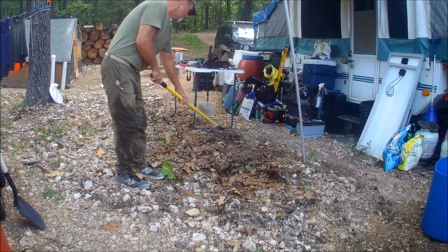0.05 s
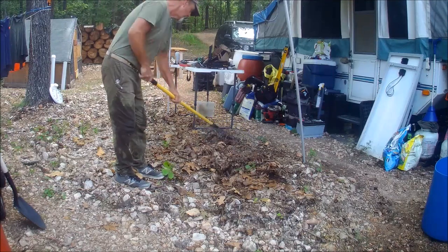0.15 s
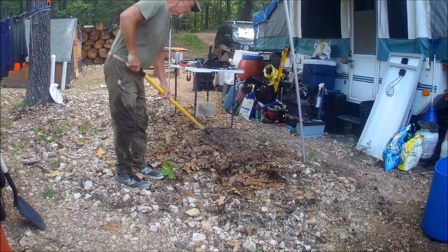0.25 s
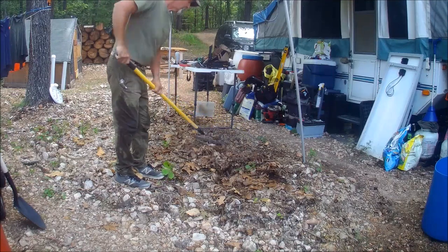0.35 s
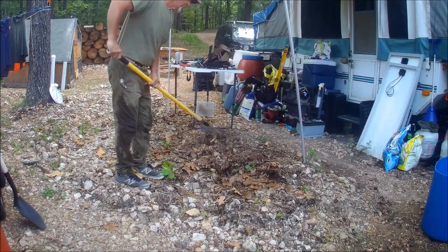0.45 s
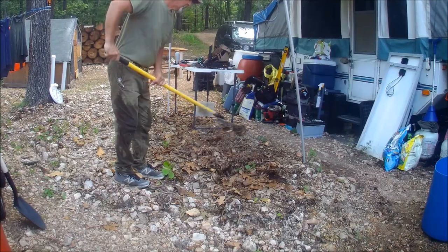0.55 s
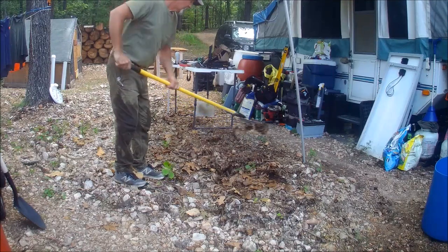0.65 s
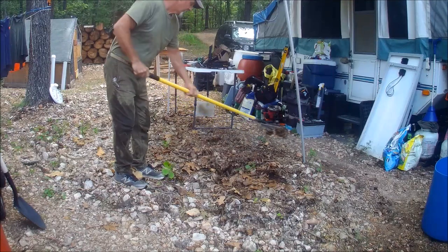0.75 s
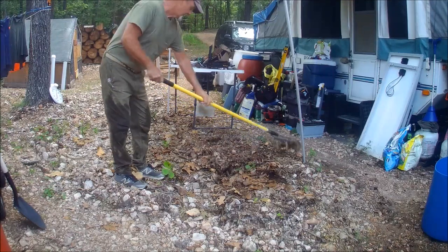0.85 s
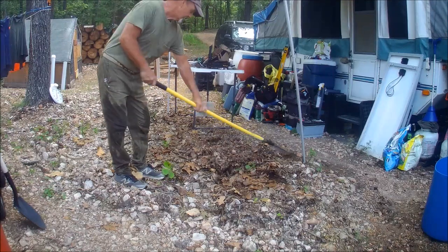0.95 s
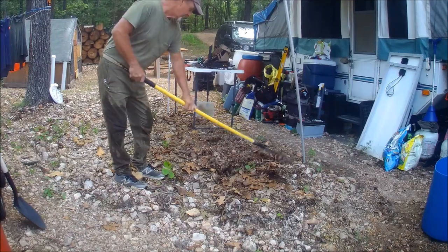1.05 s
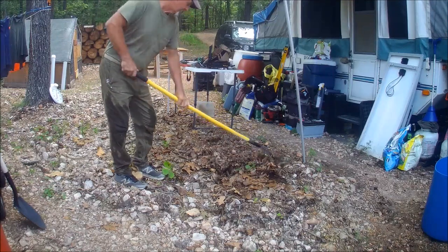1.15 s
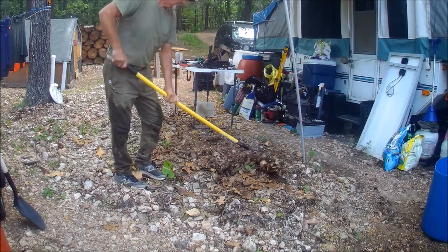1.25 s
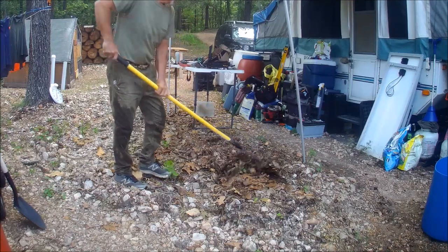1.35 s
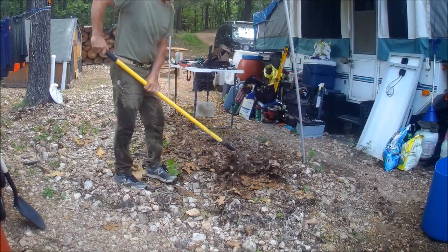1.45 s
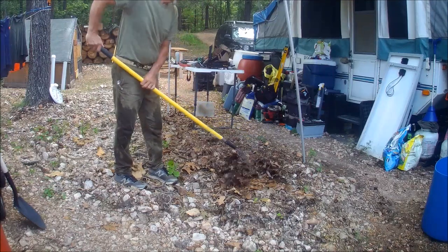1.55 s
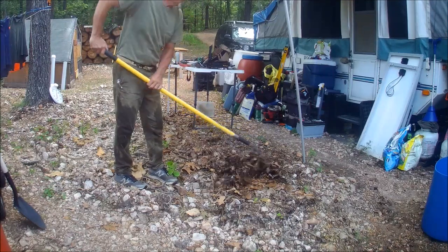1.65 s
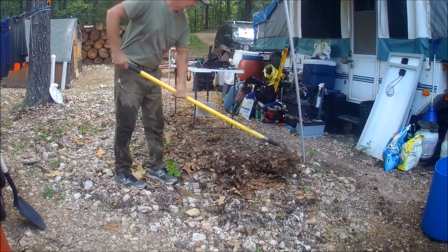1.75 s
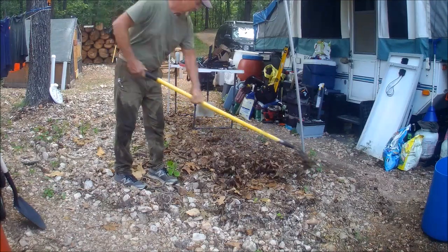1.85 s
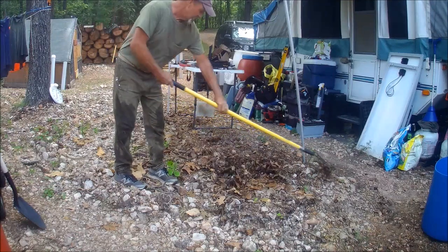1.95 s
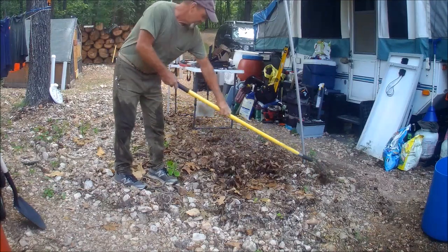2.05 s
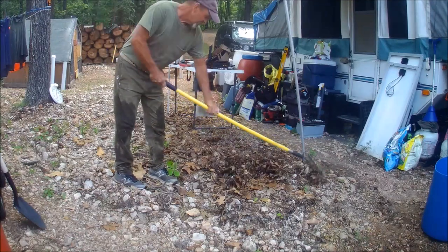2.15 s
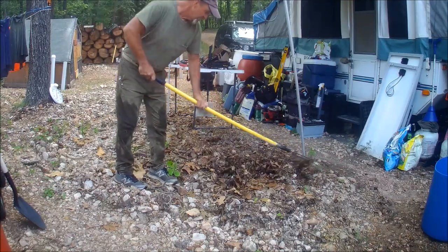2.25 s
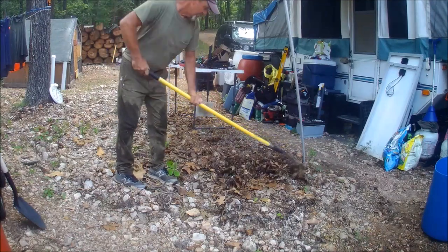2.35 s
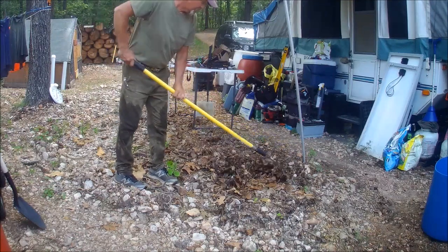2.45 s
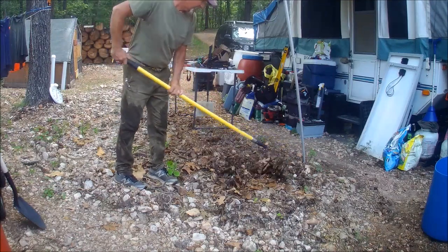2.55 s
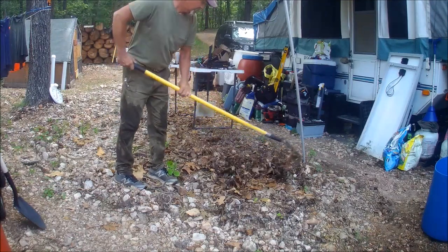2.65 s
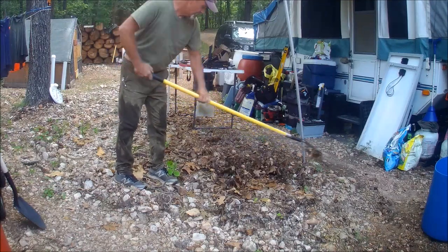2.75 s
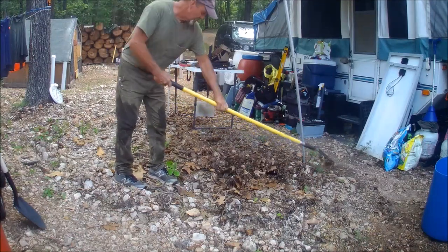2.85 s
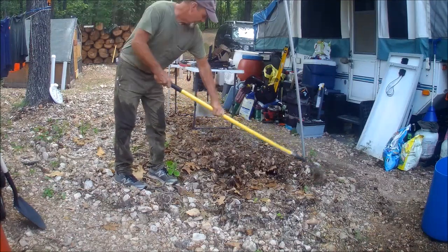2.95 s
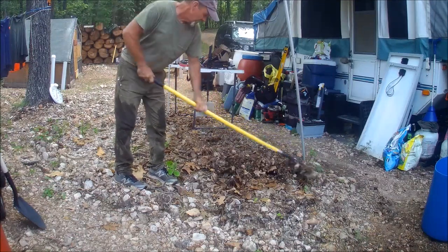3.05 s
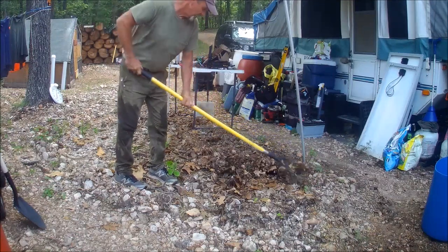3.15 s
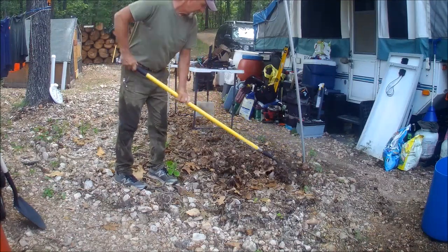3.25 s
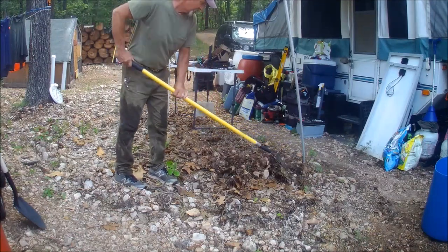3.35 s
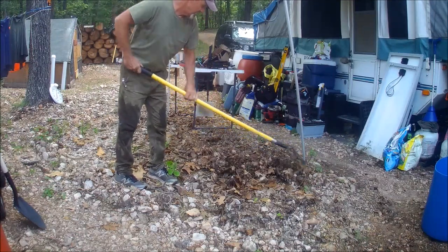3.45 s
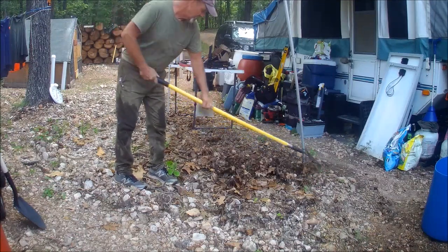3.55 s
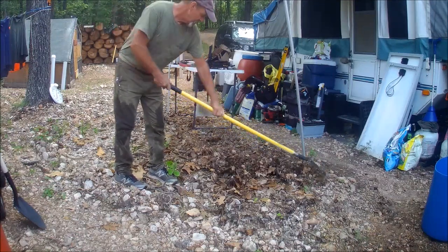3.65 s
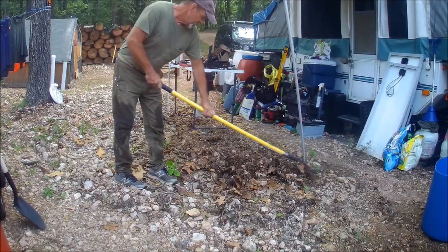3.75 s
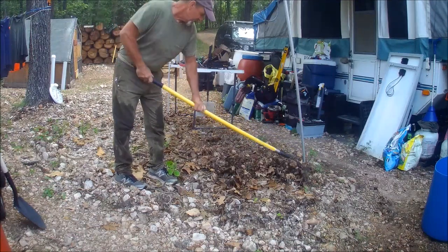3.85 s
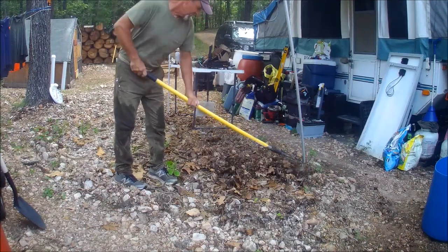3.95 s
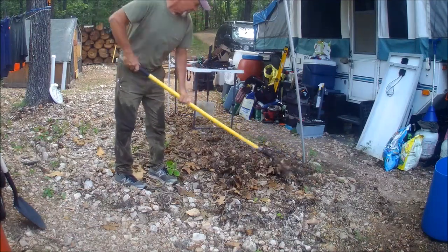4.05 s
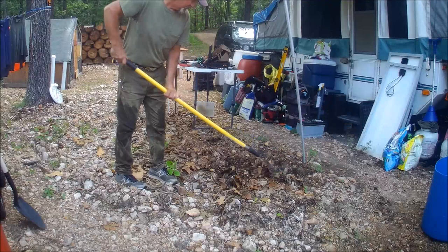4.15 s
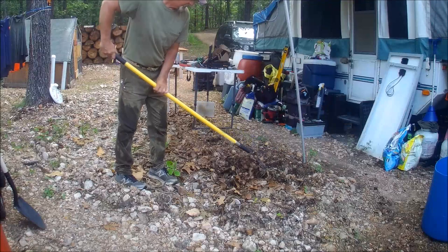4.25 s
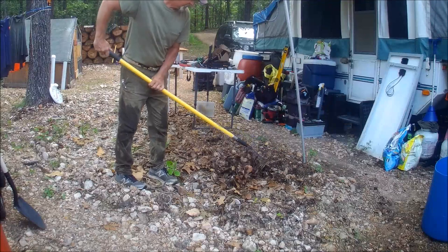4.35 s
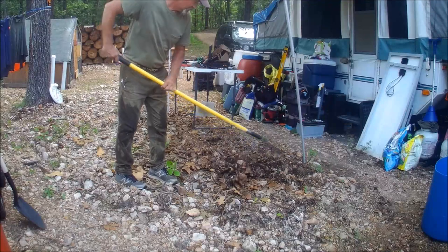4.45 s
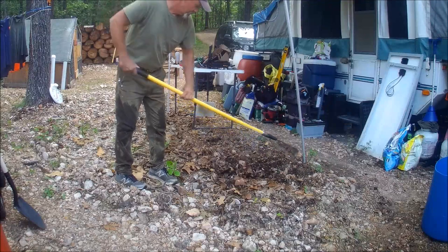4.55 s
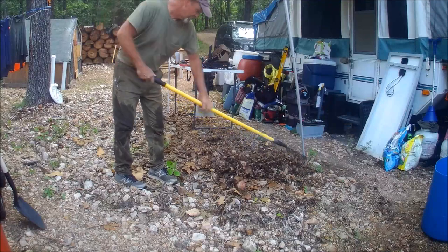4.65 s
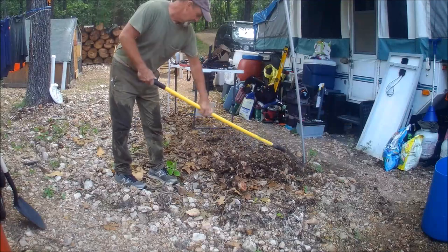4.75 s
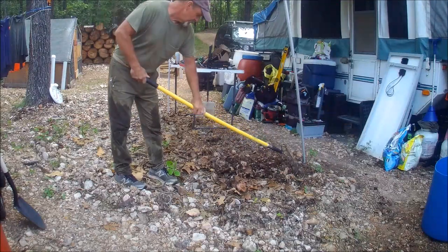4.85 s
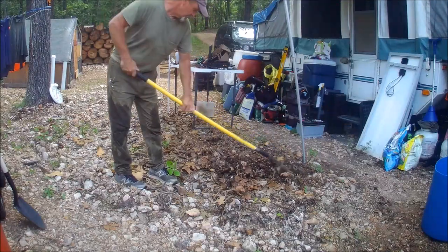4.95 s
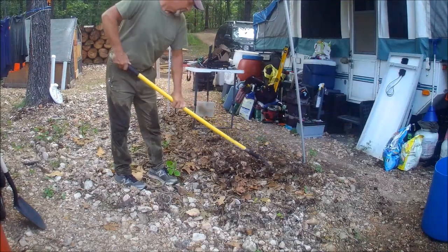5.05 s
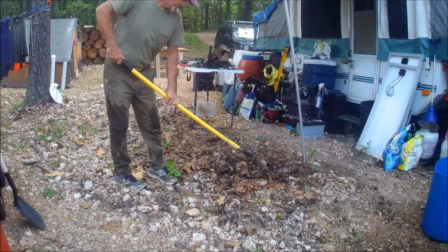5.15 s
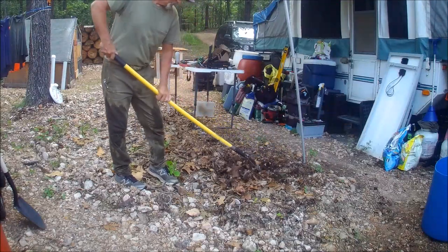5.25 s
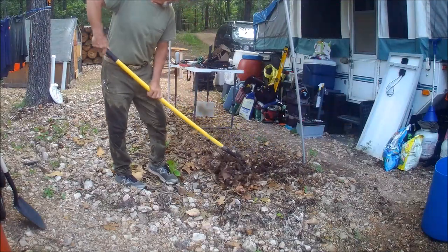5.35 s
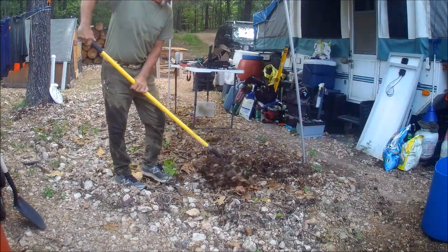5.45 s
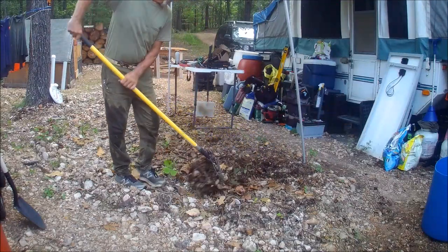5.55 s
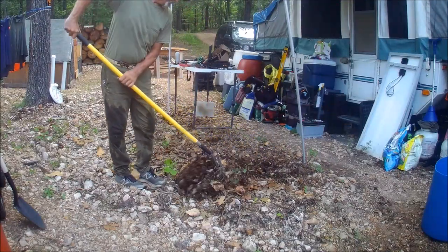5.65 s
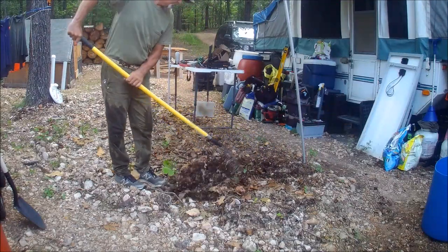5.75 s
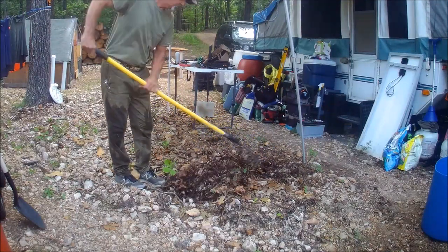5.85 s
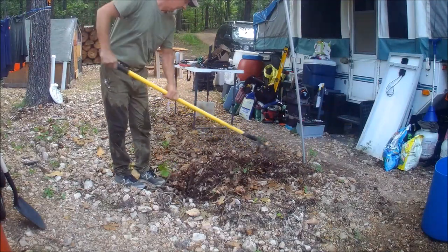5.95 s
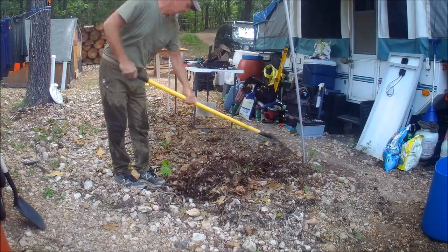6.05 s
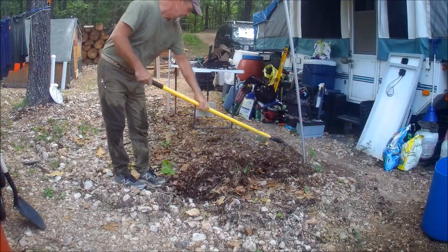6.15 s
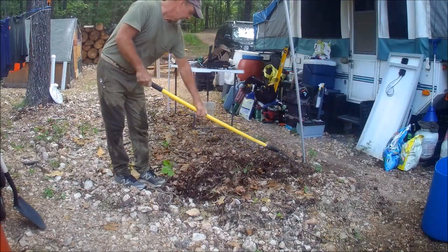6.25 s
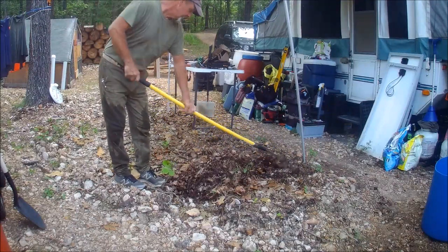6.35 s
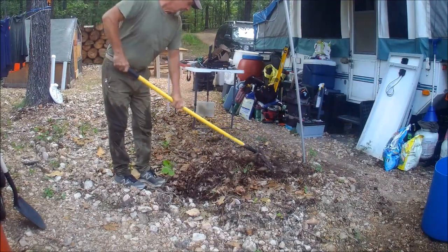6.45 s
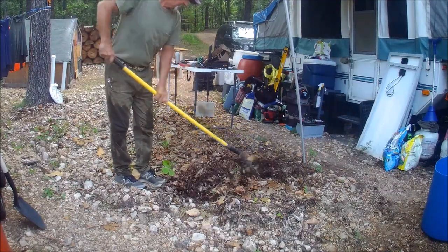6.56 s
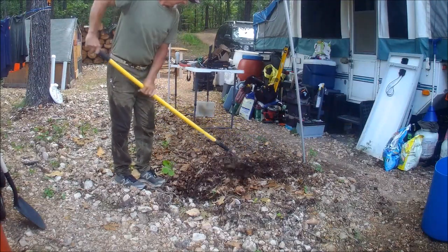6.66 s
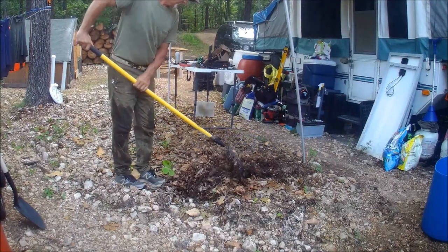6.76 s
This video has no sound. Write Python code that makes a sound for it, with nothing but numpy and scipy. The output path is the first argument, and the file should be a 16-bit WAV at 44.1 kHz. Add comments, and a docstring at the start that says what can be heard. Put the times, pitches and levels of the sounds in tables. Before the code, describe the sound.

Crunchy raking of leaves and stony ground outdoors, scrape after scrape with bright ticks, dull soil knocks and a brief bird whistle.

```python
"""Raking leaves and gravel

In a wooded yard a steel rake is pulled through dry leaves and gravel, a few metres from one microphone.
The strokes are gritty noise shaped by the pull; struck tines and stones are short resonances and sines.
Puffs of noise knock the soil, a gliding sine whistles as a bird, and dying noise makes the trees' tail.
A faint outdoor hush of filtered noise lies below."""
import sys
import numpy as np
from scipy import signal
from scipy.io import wavfile

SR = 44100
rng = np.random.default_rng(int(sys.argv[2]) if len(sys.argv) > 2 else 0)


def file_out(sig):
    """Save sig as 16-bit WAV at sys.argv[1]."""
    # one column per channel
    cols = np.atleast_2d(sig).T
    # limit, then scale
    lim = np.clip(cols, -1, 1)
    pcm = np.round(lim * 32767).astype(np.int16)
    wavfile.write(sys.argv[1], SR, pcm)


def invert_db(level):
    """Linear amplitude ratio for a level in decibels (20 dB per decade), elementwise."""
    return 10 ** (np.asarray(level, dtype=float) / 20)


N = 300315   # samples


def rms_one(x):
    """Scaled to rms 1."""
    return x / np.sqrt(np.mean(x ** 2) + 1e-20)


def at_hz(points, hz):
    """A spectrum read on a log-frequency axis."""
    table_hz, values = np.transpose(points)
    return np.interp(np.log(hz), np.log(table_hz), values)


def drift(rate_hz):
    """Slow random wander of rms 1: noise through two equal poles, one value every 40 samples."""
    r = np.exp(-2 * np.pi * rate_hz * 40 / SR)
    noise = rng.standard_normal(N // 40 + 2002)
    slow = signal.lfilter([1], [1, -2 * r, r * r], noise)[2000:]   # the filter has settled by then
    return np.interp(np.arange(N) / 40, np.arange(len(slow)), rms_one(slow))


def resonance(x, hz, width_hz):
    """A two-pole ring with gain 1 at its peak."""
    r = np.exp(-np.pi * width_hz / SR)
    feedback = [1, -2 * r * np.cos(2 * np.pi * hz / SR), r * r]
    return signal.lfilter((1 - r * r) / 2 * np.array([1, 0, -1]), feedback, x)


def octave_parts(low_hz, count):
    """Centre and band-pass filter of each of count bands an octave."""
    edges = low_hz * 2 ** np.arange(0, np.log2(17000 / low_hz), 1 / count)
    return [(np.sqrt(a * b), signal.butter(2, [a, b], "band", fs=SR, output="sos"))
            for a, b in zip(edges, edges[1:])]


def random_clicks(per_s, clump_db, clump_hz, spread_db):
    """Clumped clicks of random sign and uneven size, rms 1."""
    born = rng.random(N) < per_s * invert_db(clump_db * drift(clump_hz)) / SR
    sizes = invert_db(spread_db * np.minimum(rng.exponential(1, N), 5)) * rng.choice([-1, 1], N)
    return rms_one(born * sizes)


def grit(per_s, spread_db, smooth):
    """Snapping leaves and pebbles: clumped clicks on fine friction noise."""
    clicks = random_clicks(per_s, 4.0, 40, spread_db)
    return rms_one(clicks + smooth * rng.standard_normal(N))


# spectrum of the yard's hush: (f/Hz, relative level/dB per Hz)
HUSH = [(12, -31), (20, 8.5), (324, 5), (909, -3), (1590, -8.5), (2280, -14), (3010, -15.5), (4090, -20),
        (5250, -10), (8440, -11), (9700, -51), (11500, -12), (12800, -32), (13900, -20), (15600, -20)]
HUSH_DB = -61   # rms


def hush():
    """Far traffic, leaves in the air and microphone noise, gently patchy band by band."""
    white = rng.standard_normal((2, N))
    bands = np.zeros(N)
    for k, (hz, band) in enumerate(octave_parts(19.99, count=3)):
        level_db = at_hz(HUSH, hz) + 2.3 * drift(3.0)
        bands += invert_db(level_db) * signal.sosfilt(band, white[k % 2])
    return invert_db(HUSH_DB) * rms_one(bands)


# how long the yard's tail takes to die by 60 dB: (f/Hz, t60/s)
TREES_T60 = [(300, 0.93), (1500, 0.56), (4000, 0.58), (10000, 0.37)]


def trees(x):
    """Scattering by trunks and sheds: noise that dies band by band, starting after the nearest wall."""
    t = np.arange(SR) / SR
    white = rng.standard_normal((2, SR))
    tail = np.zeros(SR)
    for k, (hz, band) in enumerate(octave_parts(94.1, count=3)):
        tail += signal.sosfilt(band, white[k % 2]) * invert_db(-60 * t / at_hz(TREES_T60, hz))
    tail *= np.clip((t - 0.008) / 0.0037, 0, 1)   # silent for 8 ms, then fades in
    return signal.fftconvolve(x, tail / np.sqrt(np.sum(tail ** 2)))[:N]


# bird whistles: (start t/s, length/s, settled f/Hz, mean rms level at the end/dB, swell from start to end/dB)
BIRD = [(-0.04, 0.078, 3036, -42, -8), (2.004, 0.023, 2380, -64, 12), (5.697, 0.1, 3030, -39.5, 14),
        (5.827, 0.09, 3027, -59.5, -2)]
BIRD_SLIDE_HZ, BIRD_SLIDE_S = 278.3, 0.0073   # start above the pitch, time constant of the drop
BIRD_ATTACK_S, BIRD_T60_S = 0.012, 0.042


def bird():
    """A sine that drops onto its pitch, swells or fades, dies quickly and wavers a little in level."""
    out, t = np.zeros(N), np.arange(N) / SR
    for start, length, hz, end_db, swell_db in BIRD:
        left = start + length - t
        swelling_db = -swell_db * np.minimum(left / length, 1)
        dying_db = np.maximum(60 * left / BIRD_T60_S, -200)
        shape_db = np.where(left > 0, swelling_db, dying_db)
        attack = np.clip((t - start) / BIRD_ATTACK_S, 0, 1)
        pitch = hz + BIRD_SLIDE_HZ * np.exp(-np.maximum(t - start, 0) / BIRD_SLIDE_S)
        whistle = np.sqrt(2) * np.sin(2 * np.pi * np.cumsum(pitch) / SR)
        out += invert_db(end_db + shape_db + 2.2 * drift(30)) * attack * whistle
    return out


# clods and the rake's bar knocking the soil: (t/s, peak level before a common gain/dB, f/Hz, t60/s)
KNOCKS = [(0.084, -33.5, 850, 0.21), (0.101, -32.5, 380, 0.064), (0.169, -44, 775, 0.037),
          (0.327, -22.5, 895, 0.081), (0.985, -39.5, 193, 0.031), (1.132, -39, 323, 0.064),
          (1.063, -42, 246, 0.053), (1.3, -29.5, 770, 0.058), (1.495, -39, 910, 0.063),
          (2.126, -38, 460, 0.029), (2.399, -34, 950, .05), (2.429, -46, 300, 0.012),
          (2.471, -39, 210, 0.026), (3.06, -42, 420, 0.047), (3.212, -43, 394, 0.046),
          (4.052, -31, 790, 0.1), (4.96, -41, 214, 0.038), (4.995, -42, 216, 0.023),
          (5.036, -28.5, 455, 0.055), (5.059, -37, 400, 0.034), (5.802, -36, 510, 0.012),
          (5.832, -40, 395, 0.028), (6.457, -33.5, 298, 0.022), (6.485, -40.5, 254, 0.053)]
KNOCK_GAIN_DB = 4.0


def knocks():
    """Dull puffs of noise that ring the soft ground at one low pitch."""
    after = np.arange(4000) / SR
    out = np.zeros(N + len(after))
    for s, db, hz, t60 in KNOCKS:
        puff = rng.standard_normal(len(after)) * invert_db(-60 * after / t60)
        thud = resonance(resonance(puff, hz, 0.41 * hz), hz, 2.1 * hz)
        out[round(s * SR):][:len(after)] += invert_db(db + KNOCK_GAIN_DB) * thud / np.max(np.abs(thud))
    return out[:N]


# stones and single tines that ring clearly: (t/s, level before attack and waver/dB, f/Hz, t60/s)
STONES = [(0.0819, -29, 950, 0.06), (0.1177, -26, 972, 0.06), (0.1257, -32.5, 737, 0.12),
          (0.1669, -35, 770, 0.06), (0.2912, -24, 5230, 0.12), (0.2953, -27.5, 935, 0.034),
          (0.3387, -40, 740, 0.06), (0.3441, -16, 5140, 0.038), (0.3841, -34, 800, 0.051),
          (0.9785, -19, 3640, 0.04), (0.9786, -20, 3080, 0.072), (0.9806, -31, 1890, 0.055),
          (1.058, -31, 2020, 0.06), (1.0584, -30.8, 2080, 0.06), (1.0893, -20, 1780, 0.037),
          (1.09, -20, 3165, 0.066), (1.1321, -20.5, 2980, 0.044), (1.153, -27, 3100, 0.047),
          (1.2137, -29, 3260, 0.049), (1.2253, -31, 2040, 0.06), (1.3, -16.5, 5030, 0.039),
          (1.3002, -23, 3120, 0.049), (1.3011, -35, 1040, 0.066), (1.4459, -17.5, 4900, 0.03),
          (2.2392, -24.5, 3180, 0.05), (2.2902, -45, 1430, 0.078), (2.309, -30, 2000, 0.095),
          (2.3407, -10, 5570, 0.06), (2.3636, -17.1, 3680, 0.04), (2.3977, -33.5, 990, 0.066),
          (2.4219, -11.5, 3000, 0.046), (2.4239, -26.5, 1090, 0.096), (3.0294, -23, 3080, 0.06),
          (3.0626, -36, 433, 0.056), (3.1083, -30, 762, 0.083), (3.1578, -17.5, 5110, 0.049),
          (3.1593, -30, 755, 0.075), (3.207, -19.5, 2120, 0.11), (3.2193, -31.5, 957, 0.18),
          (4.0565, -26.5, 980, 0.048), (4.1288, -14, 5050, 0.06), (5.0044, -16.5, 3163, 0.072),
          (5.7733, -36.7, 5130, 0.044), (6.2933, -32, 1855, 0.085), (6.3734, -14, 3150, 0.055),
          (6.3967, -15.9, 3660, 0.06), (6.3968, -7.5, 4640, 0.069), (6.4612, -13.5, 3220, 0.043),
          (6.4661, -24, 1890, 0.06), (6.5367, -13.5, 4650, 0.022), (6.5919, -26, 1930, 0.041),
          (6.6424, -27, 2000, 0.066)]
STONE_ATTACK_S, STONE_WAVER = 0.0006, 0.46   # time constant, depth as a share of the level
STONE_WAVER_HZ = 68.6   # middle rate; each stone draws 0.5 to 1.5 times this


def stones():
    """A struck stone or tine rings at one pitch, wavering as it tumbles."""
    after = np.arange(6000) / SR
    out = np.zeros(N + len(after))
    for (s, db, hz, t60), (turn, beat) in zip(STONES, rng.random((len(STONES), 2))):
        waver_hz = STONE_WAVER_HZ * (0.5 + beat)
        waver = 1 + STONE_WAVER * np.sin(2 * np.pi * (waver_hz * after + turn))
        attack = 1 - np.exp(-after / STONE_ATTACK_S)
        shape = attack * invert_db(db - 60 * after / np.clip(t60, 0.01, 0.2))
        out[round(s * SR):][:len(after)] += waver * shape * np.sin(2 * np.pi * (hz * after + turn))
    return out[:N]


# spectrum of leaves and gravel, for the pebbles and the rake's crunch: (f/Hz, relative level/dB per Hz)
CRUNCH = [(100, -16.5), (400, -11), (750, -14), (980, -7.5), (1500, -8), (2040, -1), (2350, -9.5),
          (2900, 5.5), (4050, 0), (5300, 7), (6300, -2), (7200, -9), (8800, -13), (9800, -61), (11300, -22),
          (14000, -44), (15600, -45)]
PEBBLE_SHARPNESS = 45   # pitch over ring width


def pebbles(push):
    """Single stones and stiff leaves click and ring briefly, each dealt one of 32 pitches."""
    clicks = push * random_clicks(500, 5.0, 30, spread_db=5.6)
    dealt = rng.integers(0, 32, N)
    out = np.zeros(N)
    for k, hz in enumerate(np.geomspace(800, 9000, 32)):
        own_clicks = clicks * (dealt == k) + 1e-18   # keeps the filter off vanishing numbers
        out += invert_db(at_hz(CRUNCH, hz)) * resonance(own_clicks, hz, hz / PEBBLE_SHARPNESS)
    return out


# pull on the rake, one curve a stroke from landing to the last settling leaves: (t/s, crunch level/dB)
PULL = [
    [(0.0, -53.5), (0.07, -54.5), (0.09, -41), (0.19, -38), (0.27, -54.5), (0.3, -39.5), (0.35, -33),
     (0.47, -46), (0.66, -58.5), (0.97, -70.5)],
    [(0.99, -68), (1.02, -44.5), (1.1, -41.5), (1.19, -48), (1.23, -42), (1.27, -49), (1.31, -47),
     (1.36, -46), (1.5, -44), (1.65, -51.5), (2.1, -66)],
    [(2.14, -80), (2.2, -46), (2.27, -38), (2.33, -25), (2.43, -30.5), (2.5, -39), (2.65, -47.5),
     (2.81, -59.5), (3.02, -74)],
    [(3.04, -58), (3.07, -45.5), (3.2, -24), (3.3, -41), (3.43, -46), (3.55, -51), (3.75, -67)],
    [(3.77, -52), (3.89, -38), (3.93, -47), (4.04, -43), (4.08, -37.5), (4.14, -40), (4.32, -47),
     (4.42, -58.5), (4.59, -56.5), (4.78, -68)],
    [(4.8, -46.5), (4.85, -62), (4.97, -39.5), (5.03, -36.5), (5.12, -51.5), (5.25, -44.5), (5.44, -42),
     (5.71, -45), (5.78, -41.5), (5.95, -52), (6.26, -69.5)],
    [(6.29, -49), (6.39, -31), (6.45, -38.5), (6.49, -28.5), (6.53, -47), (6.58, -49), (6.6, -39),
     (6.66, -34.5), (6.73, -51.5), (6.81, -50)],
]
# ground met by each stroke, before the pull and pitch shares:
# (soil thud under the drag/dB, soil thud under the blows/dB, leaf treble/dB)
GROUND = [(-13, -17.5, 4), (-0.5, -14, 5.5), (-21, -17, -2), (-16, -20, 2.5), (-4.5, -24, 6),
          (-4.5, -14, 4.5), (-4, -19.5, -11)]
# how hollow the wooden handle rings in each stroke, as the grip changes: (level/dB)
HOLLOW_DB = [10, -7.5, 4.5, 2.5, 4, -2, -2]
# how gritty each stroke's drag is, gravel against bare leaves: (level at GRAVEL_HZ/dB)
GRAVEL_DB = [1.7, -2.8, 4.2, -0.5, 0.7, -3.5, 4]
LIGHT_DRAG_DB, HARD_DRAG_DB = -57.5, -37   # on the crunch scale
LANDING_THUD_DB, LANDING_S = 17.5, 0.04   # the head digs in as it lands
THUD_PER_CRUNCH_DB, TREBLE_PER_CRUNCH_DB = -0.05, 0.47   # dB per dB of crunch
SETTLING_THUD_PER_DB = 2.1   # settling leaves lose their thud


def ground(crunch_db):
    """Drag thud, blow thud, leaf treble, handle ring and gravel in dB, from the stroke and its pull."""
    t = np.arange(N) / SR
    landed = np.array([stroke[0][0] for stroke in PULL])
    which = np.clip(np.searchsorted(landed, t + 0.015) - 1, 0, None)   # switches 15 ms before landing
    thud_db, blow_thud_db, treble_db = np.array(GROUND)[which].T
    pull_db = np.maximum(crunch_db, LIGHT_DRAG_DB) - HARD_DRAG_DB
    landing = np.exp(-np.abs(t - landed[which]) / LANDING_S)
    settling_db = np.minimum(crunch_db - LIGHT_DRAG_DB, 0)
    thud_db = thud_db + THUD_PER_CRUNCH_DB * pull_db + LANDING_THUD_DB * landing
    thud_db = thud_db + SETTLING_THUD_PER_DB * settling_db
    treble_db = treble_db + TREBLE_PER_CRUNCH_DB * pull_db
    return thud_db, blow_thud_db, treble_db, np.array(HOLLOW_DB)[which], np.array(GRAVEL_DB)[which]


# tines on stones: (t/s, relative peak level/dB, brightest f/Hz, lift near that pitch/dB, contact t60/s)
BLOWS = [(0.0845, -33, 3360, 25, 0.09), (0.114, -19.5, 5360, 1, 0.13), (0.17, -13, 4600, 2.5, 0.12),
         (0.288, -13.5, 4650, 9.5, 0.083), (0.3234, -36, 4850, 9, 0.048), (0.341, -16, 4920, 8, 0.17),
         (0.3938, -21, 5360, 3, 0.13), (0.979, -10.5, 3300, -2.5, 0.13), (1.042, -17, 1970, 20, 0.028),
         (1.058, -15.5, 1920, 18.5, 0.16), (1.088, -7, 3200, -8, 0.077), (1.1335, -15, 3120, 3, 0.092),
         (1.1523, -14, 6510, 7, 0.053), (1.196, -21, 3700, 9, 0.053), (1.2062, -11.5, 6360, 6.5, 0.11),
         (1.2266, -20, 2540, 18, 0.03), (1.2875, -16.5, 5900, -24, 0.082), (1.301, -17, 5140, 15.5, 0.058),
         (1.3643, -26.5, 3500, 9.5, 0.033), (1.4455, -13.5, 5070, 11.5, 0.035),
         (1.459, -20, 6510, 5, 0.062), (1.4952, -20.5, 5720, 5, 0.034), (2.1268, -21, 5460, 5.5, 0.27),
         (2.163, -25, 5350, -0.5, 0.024), (2.216, -21.5, 4900, 11, 0.18), (2.239, -7, 3270, 15, 0.027),
         (2.294, -9.5, 5430, -5.5, 0.02), (2.308, -9, 5120, 16, 0.05), (2.3419, 0.5, 5150, 21.5, 0.023),
         (2.366, -15, 4000, 24.5, 0.033), (2.394, -11, 3080, 22, 0.014), (2.4228, -0.5, 5520, 5, 0.062),
         (2.4846, -16, 4500, 6.5, 0.018), (3.0302, -17, 5500, 0, 0.27), (3.0624, -15, 3240, 3.5, 0.046),
         (3.0957, -17, 6830, 16.5, 0.056), (3.1033, -18.5, 4290, 7, 0.091), (3.145, -30, 4690, 1, 0.026),
         (3.1584, -14, 5230, 15, 0.027), (3.176, -6, 5840, 11.5, 0.061), (3.2136, -7.5, 2040, 9, 0.11),
         (3.2334, -12.5, 5960, 0, 0.086), (3.311, -21, 6500, 9, 0.081), (3.7641, -18.5, 2980, -8, 0.13),
         (3.838, -35, 5350, 19.5, 0.067), (3.857, -22, 3790, 7, 0.046), (3.871, -11.5, 4830, -4, 0.038),
         (3.9896, -21.5, 4820, 5, 0.06), (4.0178, -26, 6750, 18.5, 0.071), (4.053, -17.5, 5630, 2, 0.08),
         (4.0696, -16.5, 3680, 7.5, 0.049), (4.083, -18, 4400, 17.5, 0.028),
         (4.1227, -15, 5450, 13.5, 0.15), (4.131, -7.5, 4700, 7.5, 0.17), (4.215, -19.5, 4570, 0, 0.1),
         (4.7985, -28, 5150, 9, 0.18), (4.8769, -25.5, 4500, 1, 0.062), (4.884, -23, 4500, -4, 0.14),
         (4.915, -33, 4040, 13, 0.044), (4.931, -19, 5600, 2, 0.11), (4.9945, -12, 4500, 0, 0.092),
         (5.003, -8.5, 2920, 7, 0.087), (5.0858, -23.5, 6460, 9, 0.023), (5.1626, -31, 3120, 9, 0.085),
         (5.241, -31, 5810, 5, 0.035), (5.357, -31, 5300, 9.5, 0.036), (5.4984, -38.5, 5500, 9, 0.039),
         (5.6074, -31.5, 5120, 17, 0.056), (5.7483, -24.5, 5000, 10.5, 0.04), (5.805, -20, 5000, -4, 0.015),
         (5.8158, -27.5, 6100, 13, 0.024), (5.873, -37, 5100, 17, 0.11), (6.2772, -20.5, 5440, 8.5, 0.093),
         (6.292, -16.5, 4700, 7, 0.052), (6.311, -14.5, 2970, -1, 0.064), (6.347, -9.5, 5570, 5.5, 0.057),
         (6.3742, -6, 3140, -16, 0.12), (6.398, -2.5, 4640, -2, 0.061), (6.426, -27, 3260, 29, 0.025),
         (6.4583, -7.5, 4490, 1, 0.21), (6.4667, -18, 4530, 21, 0.056), (6.534, -23, 4230, 16, 0.034),
         (6.5912, -11.5, 4510, 9, 0.052), (6.601, -11.5, 4640, -9, 0.036), (6.643, -12, 4700, 4.5, 0.076),
         (6.6541, -8, 2970, 11, 0.02)]
# modes of the tines and the wooden handle: (f/Hz, least ring width/Hz, relative level/dB)
TINES = [(771, 37, -12.5), (965.7, 52, -9.5), (2000, 23, -17), (2700, 8.3, -3), (3180, 23, -6),
         (3735, 58, 3), (4254, 35, -3), (4640, 14, -4), (5166, 30, -6), (5450, 13, -16), (5760, 38, -15),
         (6510, 18, 4.5), (7930, 63, -15.5)]
# how far the soil thud reaches each pitch: (f/Hz, share 0-1)
THUD_SHARE = [(450, 0.6), (750, 0.91), (1100, 0.47), (1700, 0.03)]
# how far the leaf treble reaches each pitch: (f/Hz, share 0-1)
TREBLE_SHARE = [(4500, 0.04), (6300, 0.08), (9000, 0.79)]
GRAVEL_HZ, GRAVEL_OCTAVES = 3050, 0.6   # centre and spread of the gravel colour
THUD_GAIN_DB, TREBLE_GAIN_DB = 18, 9.5   # each scaled by its share
BLOW_GAIN_DB, BLOW_TREBLE_DB = -11.5, -16.5   # the treble one is scaled by its share
THUD_PER_PEAK_DB, USUAL_PEAK_DB = -0.41, -6.5   # thud dB per dB of peak: hard blows are thinner
HANDLE_BELOW_HZ, SHARPEST_TINE = 1200, 100   # handle modes lie below; greatest pitch over width


def rake():
    """Drag and blows drive the broad crunch; the tines ring mostly when struck."""
    pull_s, pull_db = np.transpose(sum(PULL, []))
    crunch_db = np.interp(np.arange(N) / SR, pull_s, pull_db)
    thud_db, blow_thud_db, treble_db, hollow_db, gravel_db = ground(crunch_db)
    s, peak_db, bright_hz, lift_db, t60 = np.transpose(BLOWS)
    starts = (s * SR).astype(int)
    blow_thud_db = blow_thud_db[starts] + THUD_PER_PEAK_DB * (peak_db - USUAL_PEAK_DB)
    after = np.arange(6000) / SR
    attack = 1 - np.exp(-after / 0.000086)
    dying = attack * invert_db(-60 * after / np.clip(t60, 0.005, 0.3)[:, None])
    # a light drag swishes, a hard one crackles
    coarse = np.clip((crunch_db - LIGHT_DRAG_DB) / (HARD_DRAG_DB - LIGHT_DRAG_DB), 0.25, 1)
    rubbing = []   # two draws, used by alternate bands
    for _ in range(2):
        crackle = grit(1800, spread_db=3.5, smooth=0.5)
        rubbing.append(np.sqrt(coarse) * crackle + np.sqrt(1 - coarse) * rng.standard_normal(N))
    striking = [grit(6000, spread_db=4.5, smooth=2.4), grit(6000, spread_db=13.5, smooth=5.1)]

    def force(k, hz, drag_db, bite, focus, chance_db, flicker_db, tick_db):
        """The contacts as felt at the pitch hz."""
        low, high = at_hz(THUD_SHARE, hz), at_hz(TREBLE_SHARE, hz)
        pressed_db = bite * (crunch_db - HARD_DRAG_DB)   # a light drag hardly stirs the steel
        gravel = np.exp(-(np.log2(hz / GRAVEL_HZ) / GRAVEL_OCTAVES) ** 2)
        colour_db = low * thud_db + high * treble_db + gravel * gravel_db
        flickering_db = flicker_db * coarse ** 2 * drift(44)
        drag = invert_db(drag_db + pressed_db + crunch_db + colour_db + flickering_db)
        # each stone favours the tines near its own pitch
        near_db = focus * lift_db * np.exp(-(np.log2(hz / bright_hz) / 0.16) ** 2)
        blow_db = peak_db + near_db + low * blow_thud_db + high * BLOW_TREBLE_DB
        blow_db = blow_db + chance_db * rng.standard_normal(len(s))
        hits, ticks = np.zeros(N + len(after)), np.zeros(N)
        for start, gain, shape in zip(starts, invert_db(blow_db), dying):
            hits[start:start + len(after)] += gain * shape
            ticks[start] = gain * invert_db(tick_db)   # the first touch is one sharp tick
        dragged = invert_db(low * THUD_GAIN_DB + high * TREBLE_GAIN_DB) * drag * rubbing[k % 2]
        struck = hits[:N] * striking[k % 2] + ticks
        return dragged + invert_db(low * THUD_GAIN_DB + BLOW_GAIN_DB) * struck

    out = invert_db(9.0) * pebbles(coarse ** 2 * invert_db(crunch_db))
    for k, (hz, band) in enumerate(octave_parts(91.27, count=5)):
        contacts = force(k, hz, drag_db=-1.0, bite=0, focus=0.97,
                         chance_db=2.5, flicker_db=5.5, tick_db=11.5)
        out += invert_db(at_hz(CRUNCH, hz) + 3.5) * signal.sosfilt(band, contacts)
    for k, (hz, width_hz, db) in enumerate(TINES):
        width_hz = max(width_hz, hz / SHARPEST_TINE)
        grip = invert_db(hollow_db * (hz < HANDLE_BELOW_HZ))
        contacts = force(k, hz, drag_db=-2.0, bite=0.5, focus=0.85,
                         chance_db=5.0, flicker_db=4.5, tick_db=17.5)
        out += invert_db(db + 10.5) * resonance(grip * contacts, hz, width_hz)
    return out


def scene():
    """The near sounds, their scattering among the trees and the hush, at one microphone."""
    near = rake() + knocks() + stones() + bird()
    trees_db = -16
    return (near + invert_db(trees_db) * trees(near) + hush())[None]


def band_limit(x):
    """A steep low-pass at the top of the band."""
    return signal.sosfilt(signal.butter(12, 15720, fs=SR, output="sos"), x)


def record(dry):
    """The microphone's peaks are rounded by a tanh curve and the top of the treble is cut."""
    ceiling = 0.9
    rounded = ceiling * np.tanh(1.113 * dry / ceiling)
    treble_cut = signal.cheby2(12, 70, 16500, fs=SR, output="sos")   # 70 dB down from 16500 Hz
    mix = signal.sosfilt(treble_cut, rounded)
    return band_limit(mix)


dry = scene()
out = record(dry)
file_out(out)
```